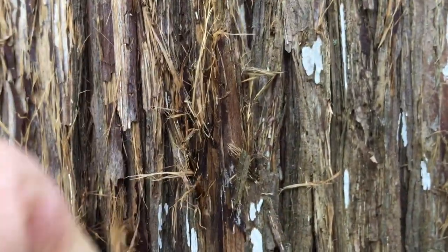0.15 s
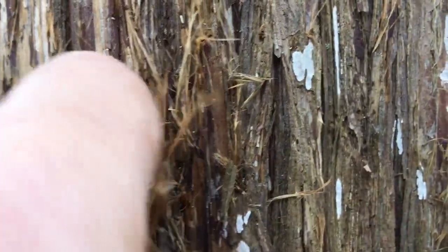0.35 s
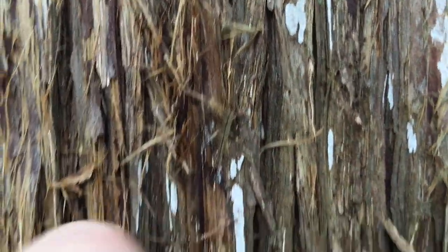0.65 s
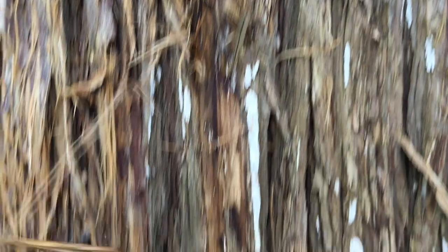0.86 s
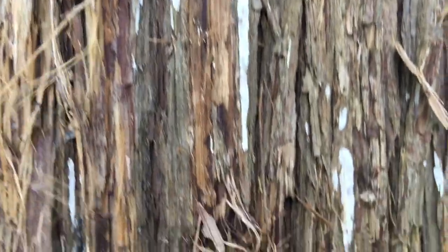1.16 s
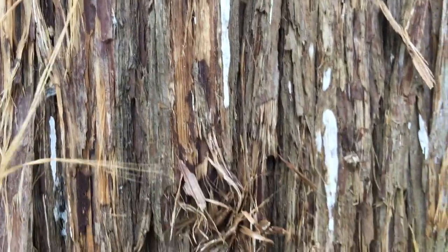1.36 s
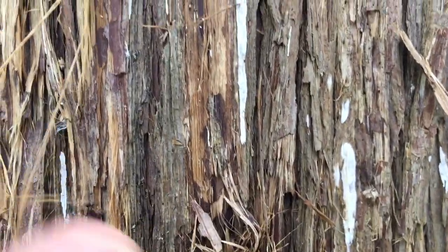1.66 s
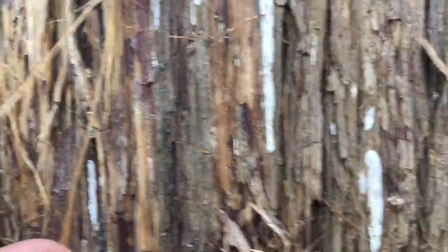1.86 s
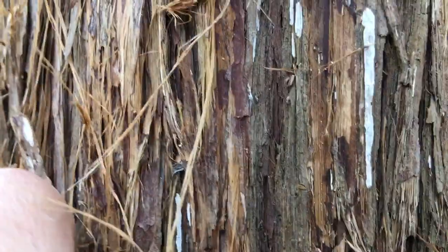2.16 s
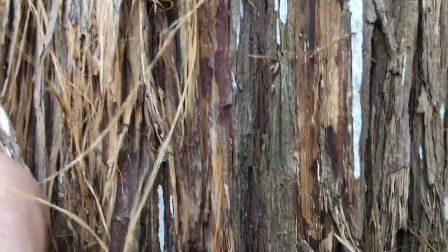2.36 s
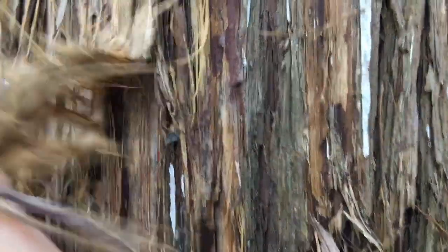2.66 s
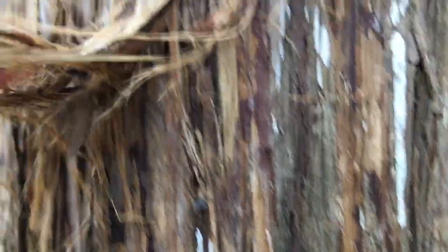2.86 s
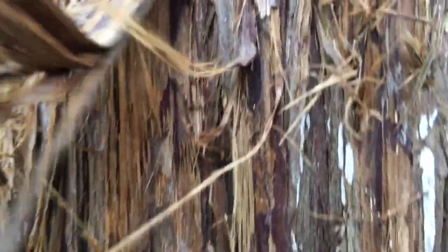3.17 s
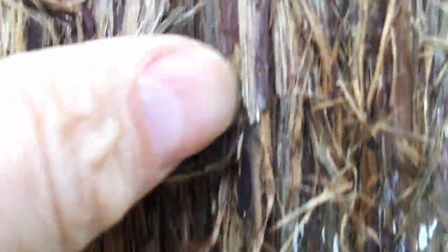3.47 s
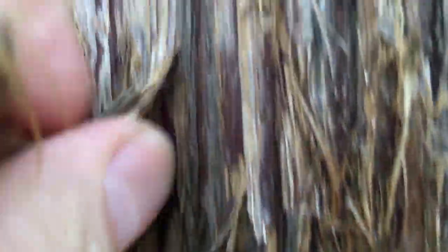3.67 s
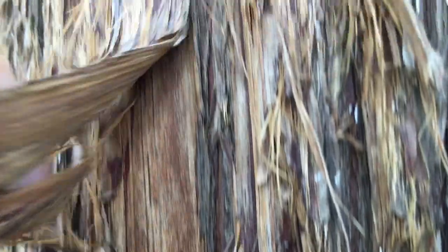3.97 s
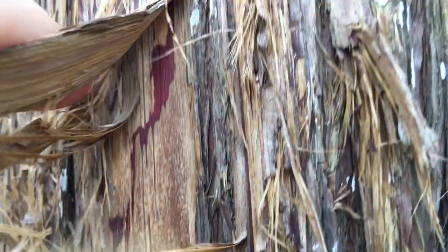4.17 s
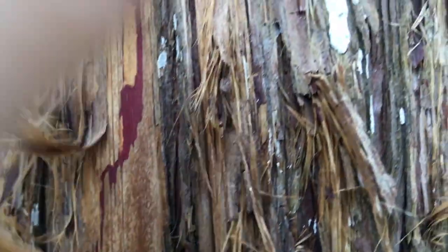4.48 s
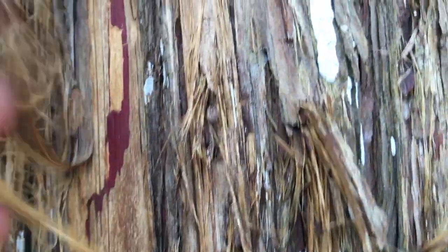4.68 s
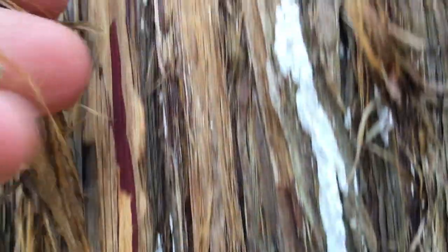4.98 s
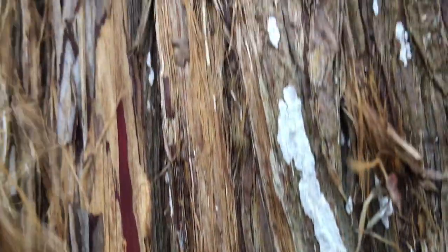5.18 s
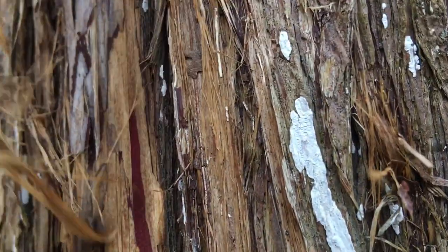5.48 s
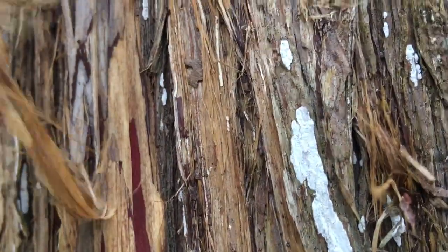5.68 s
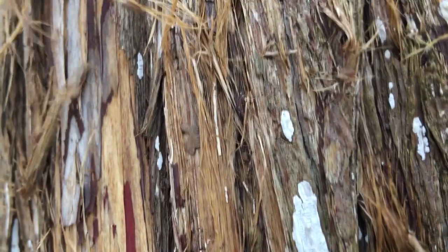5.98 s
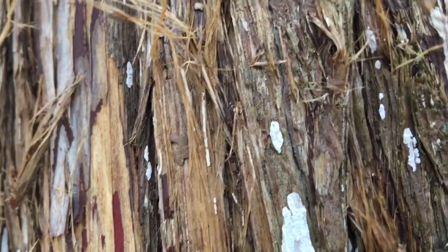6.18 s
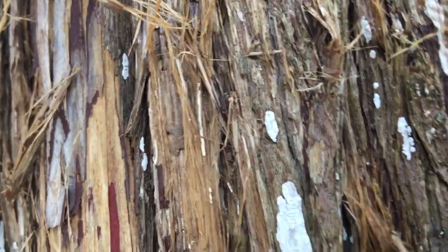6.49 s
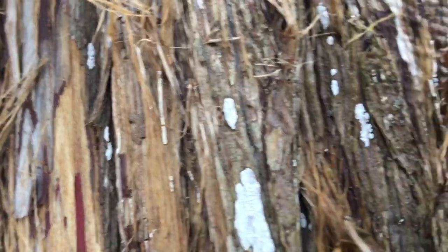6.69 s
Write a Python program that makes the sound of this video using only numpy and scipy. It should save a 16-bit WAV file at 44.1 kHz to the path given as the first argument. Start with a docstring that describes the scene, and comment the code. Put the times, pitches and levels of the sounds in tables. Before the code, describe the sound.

Close up outdoors, fingers rasp over dry stringy bark, then tear it away in crackling bursts with sharp snaps, brief rips and dull knocks.

```python
"""Outdoors, close to the microphone, dry stringy bark is peeled off a trunk by hand.
Fingers rub for a grip (dense rasp of tiny clicks), then the strip tears away: countless fine fibres
crackle, thicker ones snap as filtered bursts with a ring, and bundles rip in runs of packed cracks.
Strands scuff near one pitch and the freed strip knocks dully as short decaying sines.
Behind it all, shaped noise makes a low rumble with a faint hiss of air."""
import sys
import numpy as np
from scipy import signal
from scipy.fft import rfft, irfft
from scipy.io import wavfile

SR = 44100
rng = np.random.default_rng(int(sys.argv[2]) if len(sys.argv) > 2 else 0)


def bounce(signal):
    """Save signal as a 16-bit WAV file at the path given by the first command-line argument."""
    frames = np.transpose(np.atleast_2d(signal))
    limited = np.clip(frames, -1, 1)
    pcm = np.round(limited * 32767).astype(np.int16)
    wavfile.write(sys.argv[1], SR, pcm)


N = 301644
TIME = np.arange(N) / SR
CONTROL_TIME = np.arange(0, N / SR, 0.001)  # slower clock for the hand gestures

# spectrum of fibres breaking in the bark: pitch_hz, relative level_db (dB per Hz)
BARK_SPECTRUM = [(120, -43), (250, 1), (600, -1), (1400, -7.5), (2300, -1.5), (2800, -6), (3500, 0),
                 (4300, 1), (4900, -3), (6200, 3), (7400, 3), (9200, 4.5), (10400, 0.5), (11500, 5),
                 (16000, -1)]


def tearing(coarse, fine, bend):
    """Fibres part along the peeling edge; the same breaks shake the whole strip, more so under a harder pull."""
    # spectrum of the shaken strip: pitch_hz, relative level_db (dB per Hz)
    strip_spectrum = [(60, -20), (130, -0.5), (230, 2.5), (450, -1.5), (700, 2), (1000, 2.5), (1500, -9),
                      (2500, -27), (8000, -73)]
    flex_db, ordinary_pull_db = -59.5, -48  # strip level at an ordinary pull, and that pull's level
    flex_follows = 0.81  # share of the pull's swing in dB
    breaks = crackle(per_s=3400, spread_db=3.5, clump_db=1.2, crack_s=0.00013)
    grains = cut(through(breaks, response(BARK_SPECTRUM)), 1460, "high")
    edge = two_sizes(grains, coarse, fine)
    strip = rms_one(through(breaks, response(strip_spectrum)))
    flex = from_db(flex_db) * (bend / from_db(ordinary_pull_db)) ** flex_follows
    return edge + flex * strip


def snaps(fibres):
    """A thick fibre splinters for an instant, breaks, and lets go of its load in one clean push."""
    # spectrum of a snap before its own shelves: pitch_hz, relative level_db (dB per Hz)
    snap_spectrum = [(120, -12), (350, -7.5), (1400, -8), (2300, -4), (2800, -6), (3800, -0.5), (5000, -1),
                     (6500, 3), (9000, 6), (10400, 4.5), (12000, 7), (16000, 1.5)]
    size = 512
    lead = size // 8  # samples of splintering before the break
    release_gain, lead_db = 0.51, -15
    out = np.zeros(N)
    push = cut(signal.unit_impulse(2 * size, lead), 1800, "low")
    for start_s, level_db, ring_hz, treble_db, body_db in fibres:
        force = np.zeros(2 * size)
        splinters = rng.standard_normal(lead) * np.linspace(0, 1, lead) / np.sqrt(lead / 3)
        force[:lead] = from_db(lead_db) * splinters
        crack_s = 0.00016 * from_db(-treble_db / 2)  # duller fibres crack for longer
        force[lead:lead + size] = fracture(crack_s, tail_s=0.0016, tail_db=-9.5, ring_hz=ring_hz, ring_db=10.0)
        force = cut(force, 990, "high") + release_gain * push
        sound = rms_one(through(force, response(snap_spectrum, treble_db, body_db)))
        # the level holds for the snap's energy packed into one millisecond
        gain = from_db(level_db) * np.sqrt(SR / 1000 / len(sound))
        add(out, start_s - (lead + 5) / SR, sound * gain)
    return out


def small_snaps(load):
    """Thinner fibres break at random moments and pitches, their strength set by the load; rows for snaps()."""
    snaps_per_s = 45
    over_load_db, spread_db = 10, 2.5  # mean above the load's own level, and spread around it
    low_hz, high_hz = 2600, 13500  # range of ring pitches
    mean_treble_db, mean_body_db, colour_spread_db = -0.5, 3.5, 4
    chance = rng.random((1000, 6))
    times = np.cumsum(-np.log(1 - chance[:, 0])) / snaps_per_s
    size, treble, body = np.sqrt(3) * (2 * chance[:, 1:4].T - 1)  # uniform, spread 1
    load_db = 20 * np.log10(np.interp(times, TIME, load) + 1e-9)
    level_db = load_db + over_load_db + spread_db * size
    ring_hz = low_hz * (high_hz / low_hz) ** chance[:, -1]
    treble_db = mean_treble_db + colour_spread_db * treble
    body_db = mean_body_db + colour_spread_db * body
    rows = np.transpose([times, level_db, ring_hz, treble_db, body_db])
    return list(rows[times < N / SR])


def rips():
    """One break sets off its neighbours: a few milliseconds packed with cracks."""
    # bundles giving way in one run: start_s, length_s, level_db at full strength
    bundles = [(1.829, 0.0082, -48), (1.948, 0.0096, -38.5), (2.333, 0.0076, -46), (2.536, 0.01, -30.5),
               (3.048, 0.021, -33), (3.919, 0.011, -37), (4.324, 0.023, -36.5), (4.6048, 0.0089, -30),
               (4.62, 0.006, -36), (4.869, 0.0027, -28), (4.89, 0.0064, -45), (5.277, 0.0094, -32.5),
               (5.744, 0.0045, -38), (5.7916, 0.001, -23.5), (6.314, 0.024, -35)]
    gain = np.zeros(N)
    for start_s, length_s, level_db in bundles:
        corners_s = start_s + length_s * np.array([0, 0.2, 0.7, 1.2])
        gain += from_db(level_db) * np.interp(TIME, corners_s, [0, 1, 1, 0])
    run = crackle(per_s=6000, spread_db=3.0, clump_db=1.0, crack_s=0.00015)
    return gain * rms_one(through(run, response(BARK_SPECTRUM)))


def rubbing(rub, hiss):
    """Skin catches on the ridges thousands of times a second: a dense, resonant rasp."""
    # spectrum of skin on bark: pitch_hz, relative level_db (dB per Hz)
    rasp_spectrum = [(300, -36), (600, -28), (900, -10), (1500, -9.5), (2150, -1.5), (2750, -11),
                     (3450, 1.5), (4300, -3.5), (4900, -5), (5600, 0.5), (6500, -1.5), (7400, -7),
                     (9400, -6.5), (10400, -13), (11500, -7), (16000, -12.5)]
    catches = crackle(per_s=4200, spread_db=3.0, clump_db=1.4, crack_s=0.00015)
    grains = through(catches, response(rasp_spectrum))
    return two_sizes(grains, rub * from_db(-2.5), hiss)


def off_the_hand(x):
    """A very short echo off the cupped, moving hand: its delay slides, so the hollows slide in pitch."""
    # path of the echo as the hand moves: time_s, extra_path_m, echo_share (gain)
    hand_path = [(1.1, 0.15, .05), (1.25, .18, 0.31), (1.48, 0.167, 0.6), (1.62, .15, 0.18)]
    sound_m_per_s = 343
    time_s, extra_path_m, echo_share = np.transpose(hand_path)
    delay_s = np.interp(TIME, time_s, extra_path_m) / sound_m_per_s
    echo = np.interp(TIME - delay_s, TIME, x)
    return x + np.interp(TIME, time_s, np.clip(echo_share, 0, 1)) * echo


def scuffs():
    """A taut strand stutters along the bark and rings near one pitch."""
    # single strands dragged over ridges: middle_s, length_s, pitch_hz, width_hz, level_db at the middle
    strands = [(0.54, 0.26, 4330, 900, -50), (0.775, 0.04, 2130, 900, -45), (0.767, .14, 3450, 1000, -54),
               (0.892, 0.19, 1050, 600, -57.5), (0.98, 0.19, 5950, 1200, -46.5),
               (1.325, 0.33, 2250, 700, -57.5), (1.313, 0.19, 5700, 600, -61),
               (2.877, 0.11, 4200, 1000, -48.5), (3.077, 0.78, 8600, 1000, -53),
               (3.15, 0.28, 6540, 700, -50), (3.746, 0.23, 5460, 800, -45), (3.858, 0.083, 2100, 700, -46),
               (4.05, 0.36, 13600, 3500, -43), (5.12, 0.53, 3180, 900, -55.5),
               (5.374, 0.41, 2880, 1080, -48), (5.92, 0.087, 960, 700, -53.5),
               (6.594, 0.073, 13000, 3000, -50)]
    out = np.zeros(N)
    slips = crackle(per_s=2000, spread_db=3.0, clump_db=5.0, crack_s=0.0001)
    for middle_s, length_s, pitch_hz, width_hz, level_db in strands:
        stroke = np.cos(np.pi * np.clip((TIME - middle_s) / length_s, -0.5, 0.5))
        ringing = cut(resonate(slips, pitch_hz, width_hz), pitch_hz / 2, "high")
        out += from_db(level_db) * stroke * rms_one(ringing)
    return out


def knocks():
    """The soft strip swings only briefly after each blow, with hardly any overtones."""
    # slack strip on trunk and hand: start_s, pitch_hz, level_db before onset, decay and low-pass, t60_s
    blows = [(1.951, 194, -39, 0.0099), (2.336, 260, -42, 0.018), (2.541, 69, -28.5, 0.059),
             (2.542, 434, -46, 0.026), (2.543, 205, -37, 0.036), (2.7274, 343, -33.5, 0.015),
             (2.728, 586, -29, 0.0073), (3.031, 290, -25, 0.012), (3.429, 300, -46.5, 0.035),
             (3.841, 280, -43.5, 0.014), (4.612, 66, -29, 0.044), (4.979, 208, -38, 0.028),
             (5.2858, 102, -13.5, 0.013), (5.448, 303, -32, 0.01), (5.498, 107, -26.5, 0.027),
             (6.010, 320, -29, 0.0063), (6.012, 130, -38, 0.047), (6.3204, 505, -31.5, 0.017)]
    out = np.zeros(N)
    t = np.arange(SR // 8) / SR
    for start_s, pitch_hz, level_db, t60_s in blows:
        onset = 1 - np.exp(-6 * pitch_hz * t)
        decay = from_db(level_db - 60 * t / t60_s)
        swing = np.sin(2 * np.pi * pitch_hz * t) * onset * decay
        add(out, start_s, cut(swing, 3 * pitch_hz, "low"))
    return out


def outdoors():
    """Steady distant rumble with a faint hiss of air: white noise shaped by one long filter."""
    # spectrum of the open air: pitch_hz, relative level_db (dB per Hz)
    air_spectrum = [(20, -40), (32, -18), (45, -8), (58, -2.5), (68, -1.5), (82, -5), (110, -9.5),
                    (160, -20), (300, -30), (700, -34), (2000, -37.5), (8000, -37.5), (16000, -38)]
    noise = rng.standard_normal(N + SR)
    settled = through(noise, response(air_spectrum, size=16384))[SR:]  # skip the filter's start-up
    return from_db(-53.5) * rms_one(settled)


def crackle(per_s, spread_db, clump_db, crack_s, ring_db=0.5, count=24):
    """Tiny breaks of uneven size come in clumps; fibres of different length ring at different pitches; rms 1."""
    born = rng.random(N) < per_s / SR
    clumps = from_db(clump_db * (drift(300) + 0.5 * drift(60)))
    sizes = from_db(spread_db * np.minimum(rng.exponential(1, N), 4.2))  # no giant outliers
    clicks = born * clumps * sizes
    fibre = rng.integers(0, count, N)
    out = np.zeros(N)
    for k, ring_hz in enumerate(np.geomspace(1200, 15000, count)):
        sound = fracture(crack_s, tail_s=0.0014, tail_db=-17, ring_hz=ring_hz, ring_db=ring_db)
        out += through(clicks * (fibre == k), sound)
    return rms_one(out)


def fracture(crack_s, tail_s, tail_db, ring_hz, ring_db, size=512):
    """A very short crack, its scatter in the neighbouring fibres and the fibre's own ring; unit energy."""
    t = np.arange(size) / SR
    envelope = np.exp(-t / crack_s) + from_db(tail_db) * np.exp(-t / tail_s)
    crack = envelope * rng.standard_normal(size)
    ring = from_db(ring_db) * resonate(crack, ring_hz, ring_hz / 6)
    return rms_one(crack + ring) / np.sqrt(size)


def two_sizes(grains, coarse, fine):
    """Coarse fibres fill the middle, fine ones the treble; each share has its own gain."""
    middle = rms_one(cut(grains, 6530, "low", order=4))
    treble = rms_one(cut(grains, 7720, "high", order=4))
    return coarse * middle + fine * treble


def gesture(start_s, length_s, attack_s, release_s, build_db=0):
    """Gain of one move of the hand: it sets in, holds or builds, then dies away."""
    t = CONTROL_TIME - start_s
    held = from_db(build_db * (np.clip(t / length_s, 0, 1) - 0.5))
    fade = np.exp(-np.clip((t - length_s) / release_s, 0, 20))
    return np.clip(t / attack_s, 0, 1) * held * fade


def effort(moves, attack_s, release_s, build_db=0):
    """Gain of a series of moves, then one gain per extra dB column; overlapping moves add in power."""
    power = 0
    for start_s, length_s, level_db, *extra_db in moves:
        shape = from_db(level_db) * gesture(start_s, length_s, attack_s, release_s, build_db)
        power = power + np.outer(from_db([0, *extra_db]), shape) ** 2
    return [np.interp(TIME, CONTROL_TIME, np.sqrt(p)) for p in power]


def resonate(x, hz, width_hz):
    """A two-pole resonance with gain 1 on top."""
    r = np.exp(-np.pi * width_hz / SR)
    zeros = np.array([1, 0, -1]) * (1 - r * r) / 2
    poles = [1, -2 * r * np.cos(2 * np.pi * hz / SR), r * r]
    return signal.lfilter(zeros, poles, x)


def response(points, treble_db=0, body_db=0, size=1024):
    """Causal (minimum-phase) impulse response of unit energy with a given spectrum and two shelves."""
    hz = np.arange(size // 2 + 1) * SR / size + 1
    at_hz, level_db = np.transpose(points)
    db = np.interp(np.log(hz), np.log(at_hz), level_db)
    db = db + treble_db / (1 + (7500 / hz) ** 4)
    db = db + body_db / (1 + (hz / 1900) ** 4)
    # folding the cepstrum puts the energy at the start
    cepstrum = irfft(np.log(from_db(db)))
    cepstrum[1:size // 2] *= 2
    cepstrum[size // 2 + 1:] = 0
    return rms_one(irfft(np.exp(rfft(cepstrum)))) / np.sqrt(size)


def through(x, kernel):
    """Pass a sound through an impulse response, keeping its length."""
    return signal.oaconvolve(x, kernel)[:len(x)]


def cut(x, hz, kind, order=2):
    """Butterworth low-pass or high-pass."""
    return signal.sosfilt(signal.butter(order, hz, kind, fs=SR, output="sos"), x)


def drift(rate_hz):
    """Smooth chance, spread 1: random knots joined by lines."""
    knots = rng.standard_normal(N // 16)
    return np.interp(TIME * rate_hz, np.arange(len(knots)), knots) * np.sqrt(3 / 2)


def from_db(db):
    """Decibels to gain."""
    return 10 ** (np.asarray(db) / 20)


def rms_one(x):
    """Scale a sound to rms 1."""
    return x / np.sqrt(np.mean(x ** 2) + 1e-20)


def add(out, start_s, sound):
    """Mix a sound in at a time."""
    start = max(round(start_s * SR), 0)
    out[start:start + len(sound)] += sound[:max(N - start, 0)]


def scene():
    """The hand rubs, then pulls; its effort drives the crackle, the small snaps and the bending of the strip."""
    # strokes of the fingers: start_s, length_s, rub_db (drive level), hiss_over_rub_db
    strokes = [(-0.04, .15, -50.5, -1), (.19, 0.055, -57, 0.5), (.29, .04, -57, -4),
               (.345, 0.024, -51.5, 0), (.405, 0.021, -55.5, 8.5), (.465, 0.081, -47, 5),
               (.61, 0.043, -53.5, -1), (.665, 0.13, -44.5, -1), (.81, .13, -48.5, 2.5),
               (.93, 0.091, -48, 3), (1.035, 0.049, -47.5, 6.5), (1.21, 0.13, -64.5, 7), (1.5, .23, -59, 0)]
    # light contact kept up between strokes: start_s, length_s, rub_db
    touch = (0, 1.77, -64)
    # pulls on the strip: start_s, length_s, coarse_db halfway through, fine_over_coarse_db, bend_over_coarse_db
    pulls = [(1.82, 0.026, -60.5, 6, 4), (1.895, 0.097, -54, 4, -0.5), (2.005, 0.033, -53, 9, -5),
             (2.088, 0.02, -58, 9, -1), (2.2, 0.014, -69.5, 12, -5), (2.37, 0.056, -71.5, 9.5, 3),
             (2.535, .025, -51, 10, -1), (2.628, 0.13, -50, 6, -0.5), (2.76, 0.17, -52.5, 5, 9),
             (2.94, 0.053, -49.5, 2, 2), (3.005, .1, -43, 3, 2.5), (3.12, 0.15, -48.5, -1.5, -0.5),
             (3.455, 0.11, -47, 3, -2), (3.612, 0.22, -47.5, 4, -0.5), (3.81, 0.12, -44, 5, 0),
             (3.955, 0.25, -49.5, 7, 1), (4.21, 0.092, -51.5, 4.5, -5), (4.312, 0.071, -45, 7, 4),
             (4.415, 0.082, -54, 7, -7), (4.6, 0.32, -50.5, 5.5, -3.5), (4.855, 0.052, -46.5, 4, 0),
             (4.96, 0.31, -51.5, 6.5, -4), (5.32, 0.21, -48, 3.5, -1), (5.55, 0.1, -50.5, 8, -3),
             (5.68, 0.056, -57, 3, -11), (5.725, 0.079, -48, 9.5, 1), (5.83, 0.13, -56.5, 7, 3),
             (6.08, 0.19, -59, 4, 0), (6.31, 0.077, -55.5, 3, -15), (6.46, .08, -56.5, -1, 4),
             (6.555, 0.069, -49, 4.5, -6), (6.75, 0.059, -46.5, 2, 0)]
    # faint crackle under the strip's own tension between pulls: start_s, length_s, coarse_db halfway through
    strain = (2.64, 4.1, -58)
    # thickest fibres: start_s, level_db (energy packed into 1 ms), ring_hz, extra_treble_db, extra_body_db
    thick_fibres = [(0.3101, -39.5, 5400, -3, 4), (0.5029, -30.5, 10900, -17, -17),
                    (0.7871, -30, 1920, -32, -10), (0.9758, -31, 5600, -5, 3), (1.0109, -31, 8700, -9, 3),
                    (1.0753, -31, 9500, 7, -3), (1.8347, -38, 7700, -12, -9), (2.0555, -31, 8200, -6, -6),
                    (2.1978, -37, 5600, 5, -15), (2.2696, -31.5, 5850, 8, 4), (2.2752, -30, 12300, -4, -14),
                    (2.2935, -39.5, 9900, 4, -2), (2.32, -42, 9800, -7, 2), (2.5521, -28, 9450, -4, 0),
                    (2.7308, -25.5, 7600, -2, 15), (2.8531, -30.5, 11700, -23.5, -7),
                    (2.8793, -27, 4130, -6, 3), (2.9746, -25.5, 8800, -17, -1.5),
                    (3.012, -32.5, 2200, -10, 0), (3.03, -21, 8600, -11, -4), (3.0505, -25.5, 2480, -9, 12),
                    (3.0745, -22, 9350, -10, 5), (3.1872, -25.5, 8250, -2, -2),
                    (3.4786, -27.5, 8500, 1, -10), (3.5276, -30.5, 4140, -8, 7),
                    (3.8323, -24.5, 9900, -13, 1), (3.8403, -23, 5600, -26, 4), (3.9117, -21, 5100, 11, -2),
                    (3.9322, -21.5, 13400, -16, -6), (4.0052, -25.5, 11700, -12, -11),
                    (4.0255, -23.5, 14200, -1.5, 9), (4.0415, -18.5, 12800, 6, 10),
                    (4.051, -19.5, 9400, -11, -11), (4.0904, -25, 12700, -15.5, -8),
                    (4.2468, -31, 6200, -8, 4), (4.3811, -16.5, 3550, 17, 18),
                    (4.3937, -23.5, 3230, 11, 18), (4.4353, -27.5, 6000, -9, -8),
                    (4.5756, -30, 9700, -1, -3), (4.6112, -16.5, 11400, -6, -1.5),
                    (4.6183, -22, 3640, 7, 12.5), (4.753, -27, 6340, 10, 6), (4.868, -25, 3980, 0.5, 12.5),
                    (4.894, -22.5, 13500, -4, 5), (4.918, -31.5, 6000, 3, 21.5), (5.003, -32, 8600, -5, -3),
                    (5.0252, -27, 6967, 9, 12), (5.283, -25.5, 6300, -12, -2.5), (5.402, -22, 2500, 2, 3),
                    (5.4367, -21.5, 9100, -6, 1), (5.4484, -27, 8800, 5, 20), (5.526, -24.5, 12000, -3, -5),
                    (5.5804, -26.5, 6800, -12, 1), (5.7416, -22, 8800, -10, -11),
                    (5.7547, -17.5, 10100, -6, -0.5), (5.7892, -16.5, 9500, -8, -25),
                    (6.0103, -25, 12900, -11.5, 13.5), (6.1327, -29.5, 4500, 0, 5),
                    (6.1381, -29, 3350, 11, 20), (6.221, -33, 9600, 13, 10), (6.3114, -22.5, 13500, -7, 6),
                    (6.3202, -20, 13400, -18, 3.5), (6.399, -32.5, 3240, 1, -5),
                    (6.5653, -28, 2600, 12, 19), (6.5968, -18.5, 4440, 15.5, 5),
                    (6.7601, -30.5, 4000, 7, 8), (6.7845, -26.5, 6700, 13, 5)]

    rub, hiss = effort(strokes + [(*touch, 0)], attack_s=0.027, release_s=0.026)
    strain_fine_db, strain_bend_db = 3.5, 2  # over the coarse fibres
    tension = pulls + [(*strain, strain_fine_db, strain_bend_db)]
    # tension grows by build_db from the start of a pull to its end
    coarse, fine, bend = effort(tension, attack_s=0.01, release_s=0.025, build_db=3)

    load = coarse + from_db(-2.5) * rub  # rubbing breaks weaker fibres than pulling
    fibres = thick_fibres + small_snaps(load)
    tear = tearing(coarse, fine, bend + from_db(-12.5) * rub)  # rubbing also shakes the strip a little
    rasp = off_the_hand(rubbing(rub, hiss))
    bark = tear + snaps(fibres) + rips() + rasp + scuffs()
    return (bark + knocks() + outdoors())[None]


def record(dry):
    """The small microphone loses the deepest bass; the top is cut steeply."""
    cutoff_hz, ripple_db, stop_db = 16000, 0.2, 70
    heard = cut(dry, 39, "high", order=4)
    steep = signal.ellip(10, ripple_db, stop_db, cutoff_hz, fs=SR, output="sos")
    return signal.sosfilt(steep, heard)


dry = scene()
out = record(dry)
bounce(out)
```